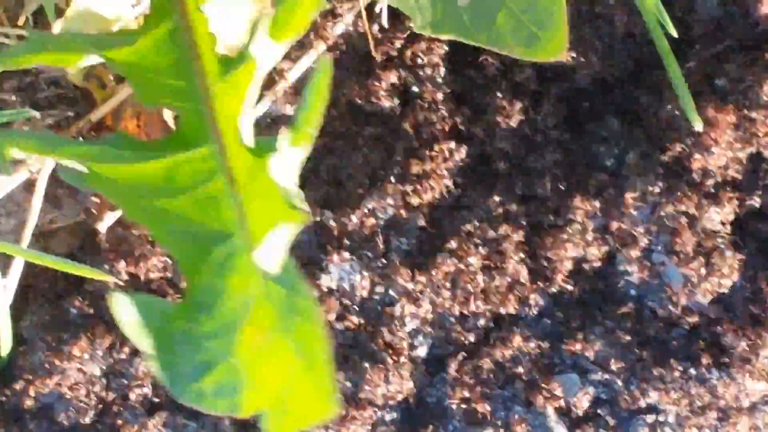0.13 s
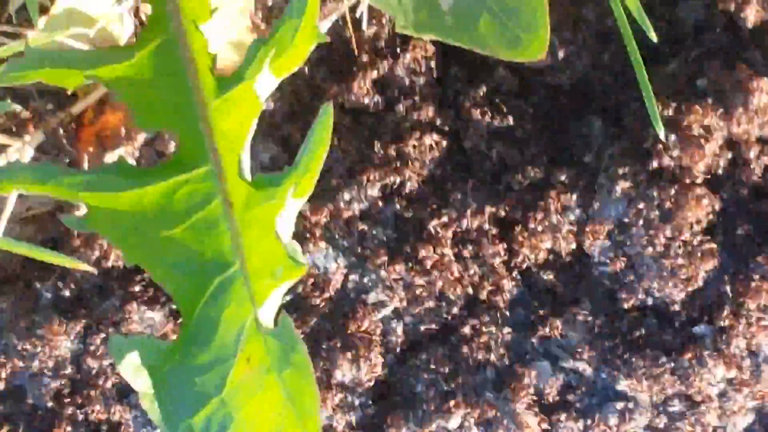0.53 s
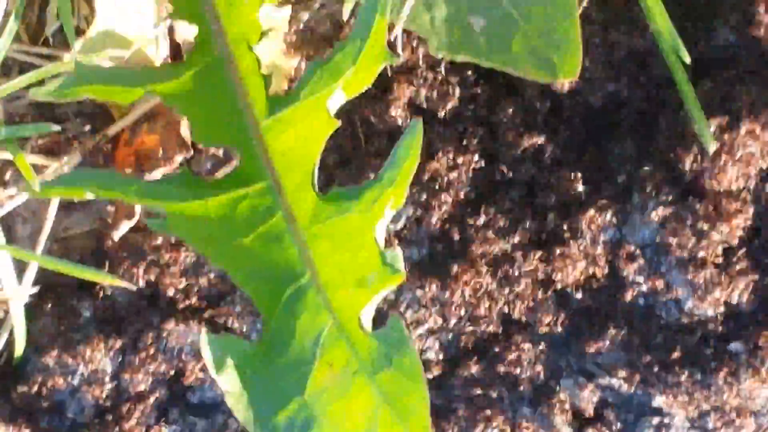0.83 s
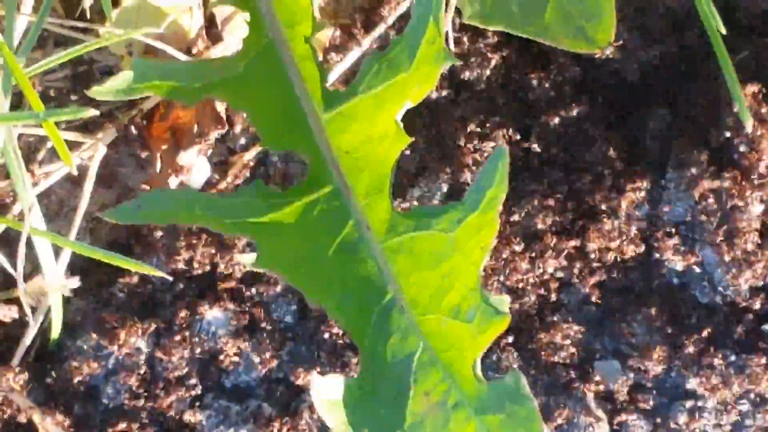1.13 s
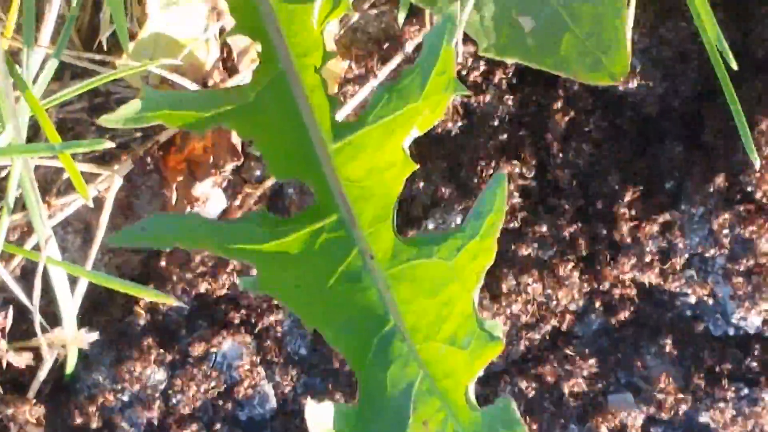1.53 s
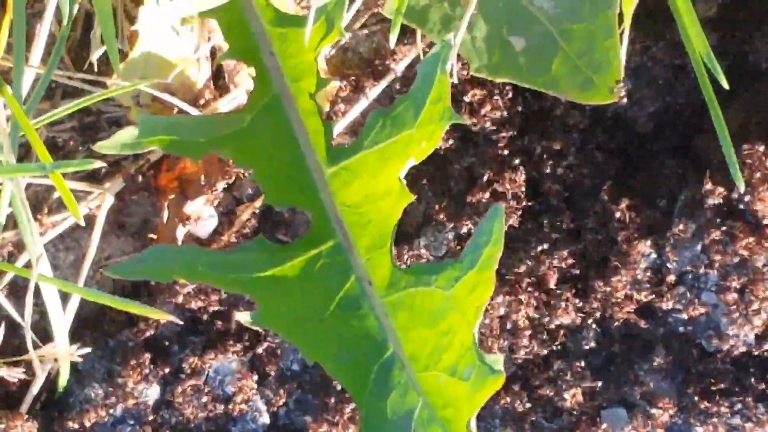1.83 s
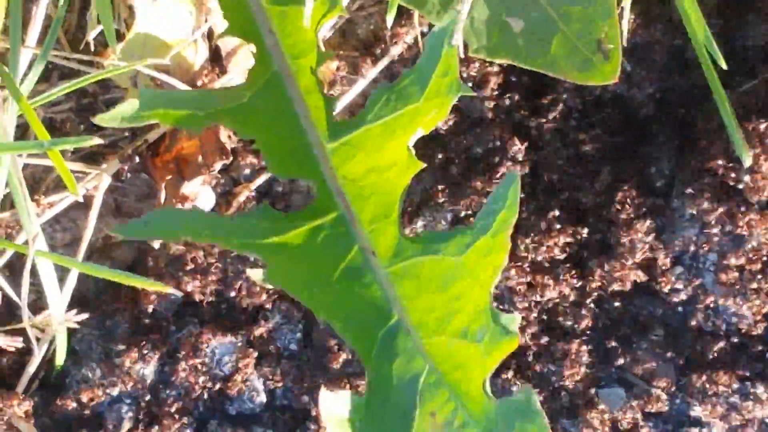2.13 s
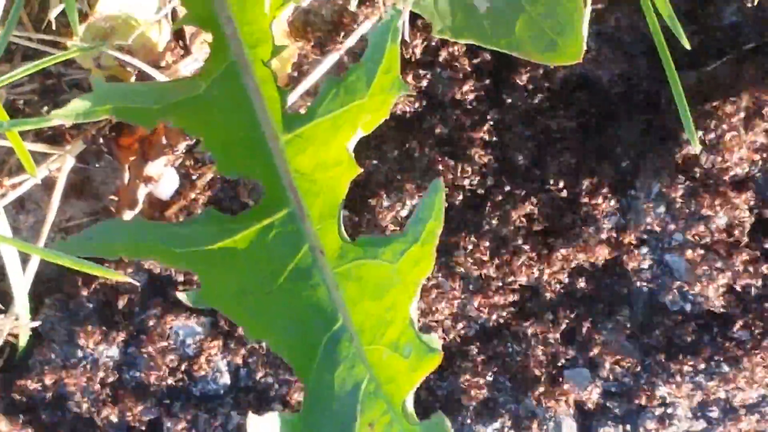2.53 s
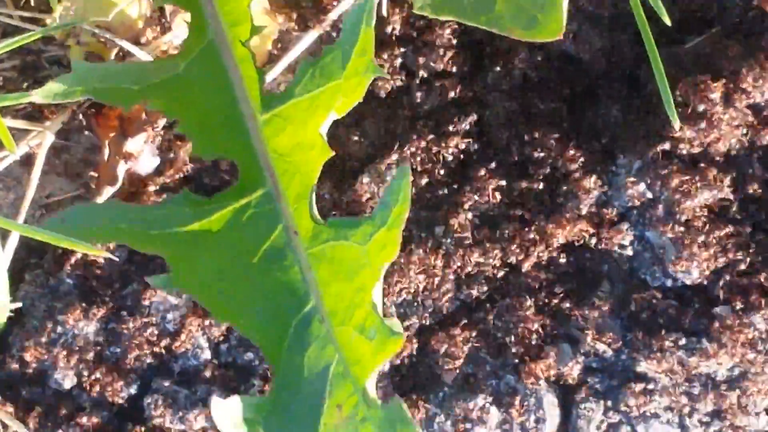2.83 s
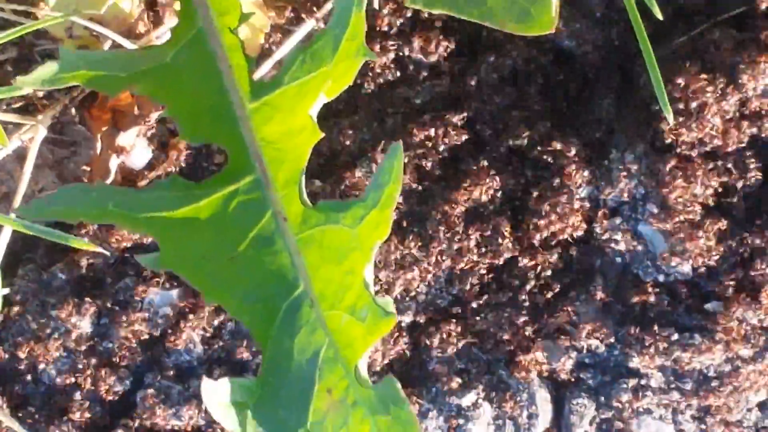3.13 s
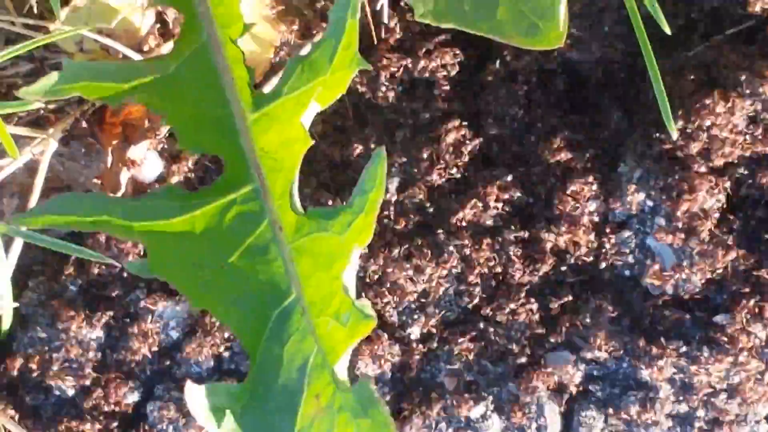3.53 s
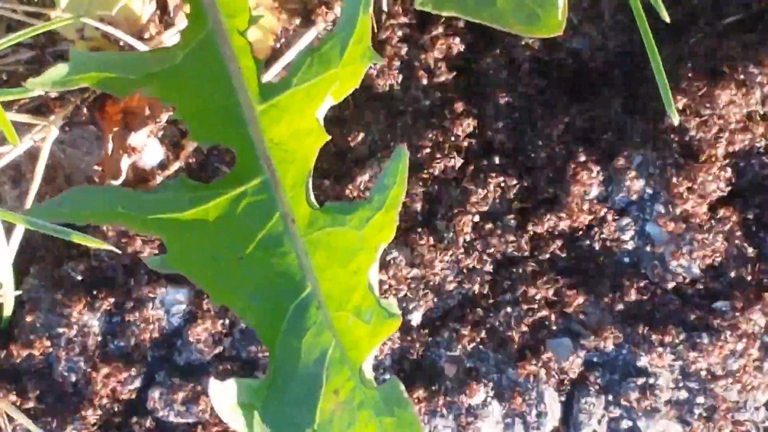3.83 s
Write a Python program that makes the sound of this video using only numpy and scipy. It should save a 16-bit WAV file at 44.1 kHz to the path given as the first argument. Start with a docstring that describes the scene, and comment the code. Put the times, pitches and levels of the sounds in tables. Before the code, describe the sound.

Wind buffeting a microphone in bursts, then calmer rustling hiss and one sharp pop

```python
"""Just over weeds and dry grass: gusty wind on a small camera's two microphone ports, most on the open right one.
Wind is lumpy noise of large and small eddies along a gust table, plus bumps of pressure as slaps.
The right port also gets a rustling hiss of shaped noise, a faint pop and later a sharp one, both pressure steps.
The covered left port has only its wind; circuit noise and thin sine whines lie under both channels.
The overall level steps down just before the sharp pop and once more soon after it."""
import sys
import numpy as np
from scipy import signal
from scipy.fft import rfft, irfft
from scipy.io import wavfile
from scipy.ndimage import uniform_filter1d

SR = 44100
rng = np.random.default_rng(int(sys.argv[2]) if len(sys.argv) > 2 else 0)


def materialize(psi):
    """Save the field psi as 16-bit PCM at rate SR to the path in sys.argv[1].

    A 1-D psi becomes a single channel; in a 2-D psi each row is a channel.
    """
    bounded = np.clip(np.atleast_2d(psi).T, -1, 1)
    quanta = np.round(bounded * 32767).astype(np.int16)
    wavfile.write(sys.argv[1], SR, quanta)


N = 176400
TIME_S = np.arange(N) / SR
LEFT_CUT_HZ, RIGHT_CUT_HZ, LOW_CUT_Q, COUPLING_HZ = 9, 95, 0.76, 18


def gain_of(db):
    """Decibels to amplitude gain."""
    return 10 ** (np.asarray(db) / 20)


def evened(x):
    """Scales to rms 1."""
    return x / np.sqrt(np.mean(x ** 2) + 1e-20)


def read_spectrum(points, hz):
    """Interpolates dB on a log-frequency axis."""
    point_hz, point_db = np.transpose(points)
    return np.interp(np.log(hz + 1), np.log(point_hz + 1), point_db)


def coloured(points, size=N):
    """Noise of the given spectrum, rms 1."""
    hz = np.fft.rfftfreq(size, 1 / SR)
    white = rfft(rng.standard_normal(size))
    return evened(irfft(white * gain_of(read_spectrum(points, hz)), size))


def wander(top_hz, size=N):
    """Slow random signal, rms 1, falling off above about top_hz."""
    hz = np.fft.rfftfreq(size, 1 / SR)
    white = rfft(rng.standard_normal(size))
    return evened(irfft(white / (1 + (hz / top_hz) ** 2), size))


def low_cut(x, hz):
    """Second-order low cut of a microphone."""
    w = 2 * np.pi * hz
    b, a = signal.bilinear([1, 0, 0], [1, w / LOW_CUT_Q, w * w], SR)
    return signal.lfilter(b, a, x)


STEADY_S, STEADINESS = 0.083, 0.97


def steadied(x, cut_hz):
    """Evens out slow level changes, as heard through the low cut, so lumps average to the gust level."""
    window = np.hanning(round(STEADY_S * SR))
    heard = low_cut(x, cut_hz) ** 2
    smoothed = signal.oaconvolve(heard / heard.mean(), window / window.sum(), "same")
    power = abs(smoothed) + 0.007  # floor limits the boost
    return x / np.sqrt(heard.mean()) / power ** (STEADINESS / 2)


# Small-eddy colour. Each row: frequency in Hz, relative level in dB.
SMALL_EDDY_SPECTRUM = [(100, -46), (250, -0.5), (350, -1.5), (500, -12), (800, -19), (1500, -42),
                       (3000, -75), (8000, -120)]
LUMPS_HZ, LARGE_LUMPS_DB, SMALL_LUMPS_DB = 44, 2, 10.5  # dB per unit of rms-1 wander
SPEEDUP = 0.15  # dB of air speed per dB of small-eddy level


def wind(gusts, large_spectrum, calm_db, cut_hz):
    """Large eddies thud in lumps; small ones flutter above, swept past faster and so higher in strong wind."""
    gust_s, gust_large_db, gust_small_db = np.transpose(gusts)
    large_db = np.interp(TIME_S, gust_s, gust_large_db)
    small_db = np.interp(TIME_S, gust_s, gust_small_db)
    lumps = wander(LUMPS_HZ)
    # air speed is 1 where small_db equals calm_db
    swept_samples = np.cumsum(gain_of(SPEEDUP * (small_db - calm_db)))
    small = np.interp(swept_samples, np.arange(2 * N), coloured(SMALL_EDDY_SPECTRUM, size=2 * N))
    large = coloured(large_spectrum) * gain_of(LARGE_LUMPS_DB * lumps)
    small = small * gain_of(SMALL_LUMPS_DB * lumps)
    return gain_of(large_db) * steadied(large, cut_hz) + gain_of(small_db) * steadied(small, cut_hz)


def bump(start_s, sigma_s):
    """Gaussian bump of height 1 centred on start_s."""
    return np.exp(-0.5 * ((TIME_S - start_s) / sigma_s) ** 2)


def slaps(rows):
    """Each slap of air is one smooth bump of pressure."""
    return sum(peak * bump(s, sigma_ms / 1000) for s, peak, sigma_ms in rows)


GIVE_WAY_SIGMA_S, GIVE_WAY = 0.0052, 2.16


def giving_way(rows):
    """One strong eddy fills the port: the others sink while it passes, more for a stronger one."""
    crowding = sum(abs(peak) * bump(s, GIVE_WAY_SIGMA_S) for s, peak, _ in rows)
    return 1 / (1 + GIVE_WAY * crowding)


# Right gusts. Each row: time in seconds, large-eddy level in dB, small-eddy level in dB, before giving way.
RIGHT_GUSTS = [(0.0, -17.5, -33), (0.05, -13, -29), (0.07, -28, -33.5), (0.13, -17, -27.5),
               (0.17, -23, -39.5), (0.23, -29.5, -40.5), (0.28, -26.5, -40), (0.31, -15.5, -27),
               (0.36, -14, -24.5), (0.39, -22.5, -30), (0.43, -18.5, -35), (0.46, -15, -21),
               (0.48, -1.5, -21), (0.5, -6.5, -21.5), (0.52, -7.5, -34), (0.57, -28.5, -35),
               (0.62, -15, -31), (0.68, -31.5, -44.5), (0.71, -16, -39.5), (0.74, -18, -32),
               (0.8, -26, -46.5), (0.82, -15, -36.5), (0.87, -17, -22), (0.92, -22, -42), (1.0, -21, -31.5),
               (1.03, -13.5, -30.5), (1.07, -25, -30), (1.11, -27, -46), (1.14, -17, -39),
               (1.17, -27.5, -47), (1.19, -24, -40.5), (1.24, -10.5, -23), (1.27, -20, -34),
               (1.34, -22, -37.5), (1.37, -35, -45), (1.43, -20.5, -29), (1.6, -31.5, -52.5),
               (1.64, -30, -44), (1.67, -19.5, -40.5), (1.72, -33, -48), (1.81, -29.5, -48),
               (1.91, -33.5, -57), (2.0, -21.5, -46.5), (2.12, -29.5, -49.5), (2.17, -18, -38),
               (2.2, -18.5, -36), (2.26, -12, -27), (2.3, -29, -38), (2.34, -13, -39), (2.37, -39.5, -46.5),
               (2.39, -27, -43.5), (2.47, -38, -55.5), (2.5, -31.5, -50.5), (2.83, -40, -46.5),
               (2.92, -31.5, -43), (3.05, -35, -47.5), (3.09, -25, -49.5), (3.12, -37, -48),
               (3.22, -30.5, -56.5), (3.33, -36.5, -48), (3.57, -31.5, -47.5), (3.64, -38, -58),
               (3.87, -31, -48.5), (4.0, -39.5, -51.5)]
# Right large-eddy colour before the low cut. Each row: frequency in Hz, relative level in dB.
RIGHT_LARGE_SPECTRUM = [(15, -11), (40, 8), (110, 3), (170, -6), (250, -11), (350, -25), (700, -54),
                        (2500, -120)]
# Right slaps before the low cut. Each row: centre in seconds, signed peak, Gaussian sigma in ms.
RIGHT_SLAPS = [(.054, 0.6, 0.86), (.095, 0.82, 0.91), (.132, -0.52, .45), (.316, 0.57, 0.58),
               (.325, 0.88, 1.17), (.3527, 0.72, 1.4), (.365, -1, 0.73), (.403, 0.24, 0.43),
               (.4552, 0.79, 0.64), (.464, 0.72, 0.77), (.4726, 1, 0.66), (.482, 0.86, 1.13),
               (.484, 0.39, .3), (.5, 0.79, 0.44), (.518, 0.85, 1.9), (.605, 0.21, 0.42),
               (.747, -0.37, 0.68), (.83, -0.82, 1.13), (.8663, -0.29, .2), (.8695, 0.98, 1.1),
               (.8705, -0.59, .33), (.8735, -0.47, .8), (.8965, 0.32, 0.53), (.985, 0.43, 0.73),
               (1.03, 0.97, 0.99), (1.063, -0.58, 0.74), (1.2236, 0.41, 0.83), (1.2323, 1, 0.81),
               (1.2375, .3, .45), (1.2487, 0.64, .5), (1.293, 0.44, .49), (1.4305, 0.22, 0.42),
               (1.434, -0.26, 1.4), (1.4606, 0.43, 1.04), (1.663, 0.53, 1.37), (2.1705, 0.77, 1.16),
               (2.2125, 0.57, 0.94), (2.2503, 0.54, 0.6), (2.2648, 0.97, 0.97), (2.319, 0.18, 0.47)]


def right_wind():
    """Strong wind on the open port: eddies that yield to sharp slaps."""
    eddies = wind(RIGHT_GUSTS, RIGHT_LARGE_SPECTRUM, calm_db=-30, cut_hz=RIGHT_CUT_HZ)
    return eddies * giving_way(RIGHT_SLAPS) + slaps(RIGHT_SLAPS)


# Left gusts. Each row: time in seconds, large-eddy level in dB, small-eddy level in dB.
LEFT_GUSTS = [(0.0, -36.5, -59.5), (0.06, -18, -45), (0.1, -33, -51.5), (0.26, -33.5, -61.5),
              (0.38, -26, -47), (0.46, -36, -61), (0.51, -28, -47), (0.62, -33, -60), (0.7, -33, -44.5),
              (0.74, -41, -64.5), (0.86, -38, -50.5), (1.03, -39, -66.5), (1.06, -35.5, -55.5),
              (1.15, -28.5, -56.5), (1.22, -46, -66.5), (1.26, -31, -57), (1.42, -37, -57),
              (1.55, -42, -62), (1.64, -41, -65.5), (1.83, -50, -66.5), (1.92, -41, -58),
              (2.03, -45, -68.5), (2.41, -40.5, -66.5), (2.68, -40.5, -67), (2.86, -39.5, -62.5),
              (3.08, -48, -69), (3.54, -40.5, -59), (3.68, -46, -66), (4.0, -44, -65.5)]
# Left large-eddy colour before the low cut. Each row: frequency in Hz, relative level in dB.
LEFT_LARGE_SPECTRUM = [(10, -8), (30, -15), (60, 4.5), (110, -3), (200, -11.5), (300, -25.5), (600, -64),
                       (2500, -120)]
# Left slaps before the low cut. Each row: centre in seconds, signed peak, Gaussian sigma in ms.
LEFT_SLAPS = [(.054, .04, 0.98), (.38, .04, 1), (.5, 0.046, .6), (.665, 0.035, 0.8), (.704, -0.05, 0.43),
              (1.063, 0.021, .8)]


def left_wind():
    """Weaker wind on the covered port: eddies and small slaps."""
    return wind(LEFT_GUSTS, LEFT_LARGE_SPECTRUM, calm_db=-52, cut_hz=LEFT_CUT_HZ) + slaps(LEFT_SLAPS)


# Pressure steps on the right port before the low cut. Each row: start in seconds, step height.
POP_STEPS = [(2.9262, .07), (3.33986, 1.25)]
PORT_HZ, PORT_T60_S, PORT_RING = 5600, 0.004, 0.06  # ring relative to step height


def pops():
    """Each pop is a step of pressure that rings the port briefly; the low cut makes it swing back."""
    out = np.zeros(N)
    for start_s, height in POP_STEPS:
        t = np.maximum(TIME_S - start_s, 0)
        ring = PORT_RING * gain_of(-60 * t / PORT_T60_S) * np.sin(2 * np.pi * PORT_HZ * t)
        step = np.minimum(t * SR, 1)  # rises over one sample
        out += height * (step + ring)
    return out


# Rustle colour, lifted near 7 kHz by the port's resonance. Each row: frequency in Hz, relative level in dB.
RUSTLE_SPECTRUM = [(150, -68.5), (500, -76.5), (900, -76), (2000, -83), (3500, -90), (5000, -86),
                   (6200, -84.5), (7200, -78), (8200, -82.5), (9500, -91), (12000, -96), (14000, -106),
                   (16000, -112)]
RUSTLE_RMS_DB = -40.5  # before the low cut and level steps
BRIGHTEN_DB_PER_S, BRIGHT_ABOVE_HZ = 0.75, 1800  # before evening the whole to rms 1
PATCHY_RMS_DB, FLICKER_RMS_DB, SWELL_RMS_DB = 0.64, 0.35, 0.09
FRAME, HOP = 256, 64  # samples


def rustle():
    """Countless tiny scrapes merge into a hiss, made as noise with faint patches, flicker and swell."""
    frames, hz = N // HOP + 5, np.fft.rfftfreq(FRAME, 1 / SR)
    real, imaginary, patches = rng.standard_normal((frames, len(hz), 3)).T
    patches = uniform_filter1d(patches, size=4, axis=0)  # across frequency
    patches = evened(uniform_filter1d(patches, size=30, axis=1))  # across time
    frame_start = np.arange(frames) * HOP
    broadband_db = FLICKER_RMS_DB * wander(52.0) + SWELL_RMS_DB * wander(13.0)
    broadband_db = broadband_db[np.minimum(frame_start, N - 1)]
    brighten_db = BRIGHTEN_DB_PER_S * frame_start / SR * (hz > BRIGHT_ABOVE_HZ)[:, None]
    level_db = PATCHY_RMS_DB * patches + broadband_db + brighten_db
    spectrogram = (real + 1j * imaginary) * gain_of(level_db)
    flat = signal.istft(spectrogram, nperseg=FRAME, noverlap=FRAME - HOP)[1][:N]
    colour = gain_of(read_spectrum(RUSTLE_SPECTRUM, np.fft.rfftfreq(N, 1 / SR)))
    return gain_of(RUSTLE_RMS_DB) * evened(irfft(rfft(flat) * colour, N))


# Circuit-noise colour, both channels. Each row: frequency in Hz, relative level in dB.
CIRCUIT_SPECTRUM = [(100, -7), (400, 0), (800, -2.5), (2000, -6.5), (6000, -8.5), (16000, -7.5)]
CIRCUIT_RMS_DB = -59  # before the low cuts and level steps


def circuit_noise():
    """Amplifier noise, alike in colour but unrelated between the channels."""
    return gain_of(CIRCUIT_RMS_DB) * np.array([coloured(CIRCUIT_SPECTRUM), coloured(CIRCUIT_SPECTRUM)])


# Electronic whines before wavering and level steps. Each row: frequency in Hz, left rms in dB, right rms in dB.
WHINE_TONES = [(6000, -104, -74), (7000, -104, -68), (8000, -96, -65.5), (10000, -95, -72.5),
               (10656, -104, -77), (12000, -99, -79), (14000, -85.5, -75)]
WHINE_WAVER_RMS_DB = 1


def whines():
    """Thin sines at fixed pitch, each wavering slightly in level, alike on both channels."""
    out = np.zeros((2, N))
    for hz, left_db, right_db in WHINE_TONES:
        level_db = [[left_db], [right_db]] + WHINE_WAVER_RMS_DB * wander(4.8)
        tone = np.sin(2 * np.pi * (hz * TIME_S + rng.random()))
        out += np.sqrt(2) * gain_of(level_db) * tone
    return out


def scene():
    """Wind on both ports, pops and rustle on the right, electronics under both."""
    left = left_wind()
    right = right_wind() + pops() + rustle()
    return np.array([left, right]) + circuit_noise() + whines()


# Lasting level steps, both channels. Each row: start in seconds, added change in dB.
LEVEL_STEPS = [(3.322, -3.5), (3.69, -2.6)]
STEP_S, BAND_EDGE_HZ = 0.0018, 15550


def record(dry):
    """Low cuts, the level steps, then the band limit."""
    left = low_cut(dry[0] - dry[0, 0], LEFT_CUT_HZ)
    right = low_cut(dry[1] - dry[1, 0], RIGHT_CUT_HZ)
    b, a = signal.butter(1, COUPLING_HZ, "high", fs=SR)
    cut = signal.lfilter(b, a, np.array([left, right]))
    level_db = sum(db * np.clip((TIME_S - s) / STEP_S, 0, 1) for s, db in LEVEL_STEPS)
    band_limit = signal.firwin(1023, BAND_EDGE_HZ, window=("kaiser", 9), fs=SR)
    return signal.oaconvolve(cut * gain_of(level_db), band_limit[None], "same")


dry = scene()
out = record(dry)
materialize(out)
```